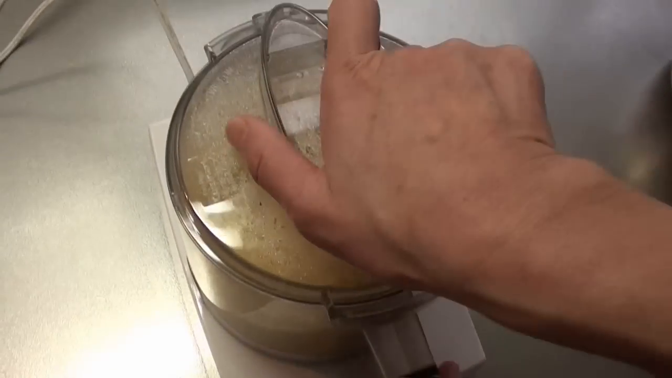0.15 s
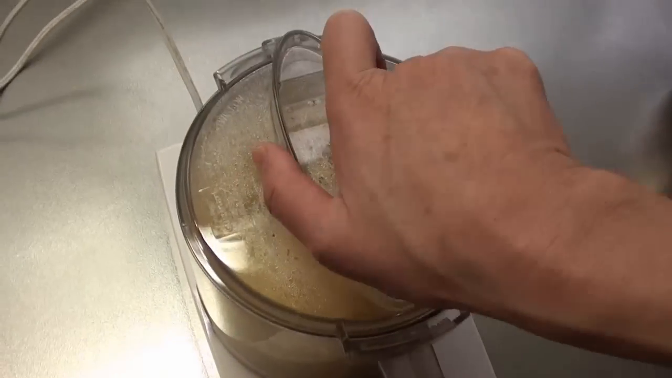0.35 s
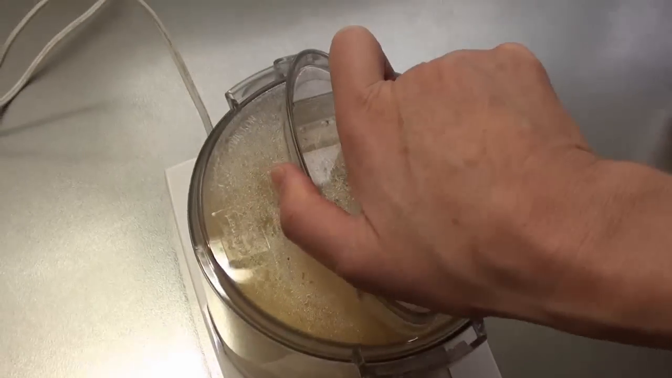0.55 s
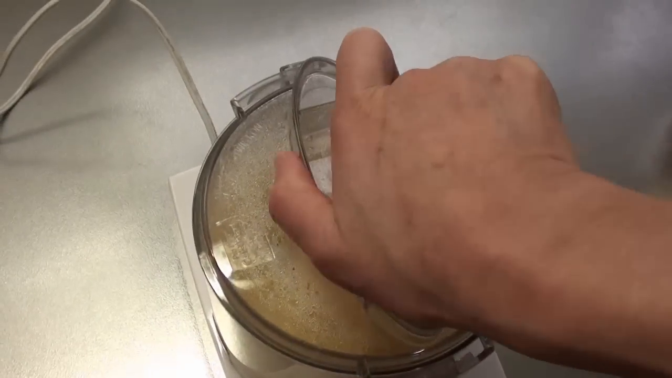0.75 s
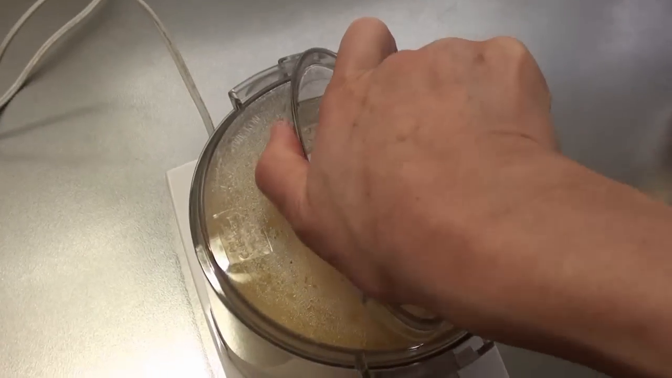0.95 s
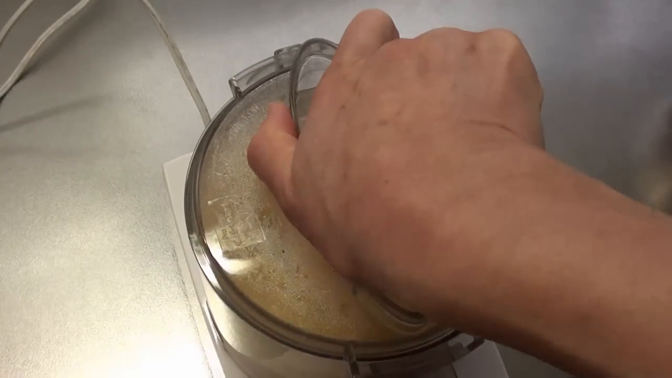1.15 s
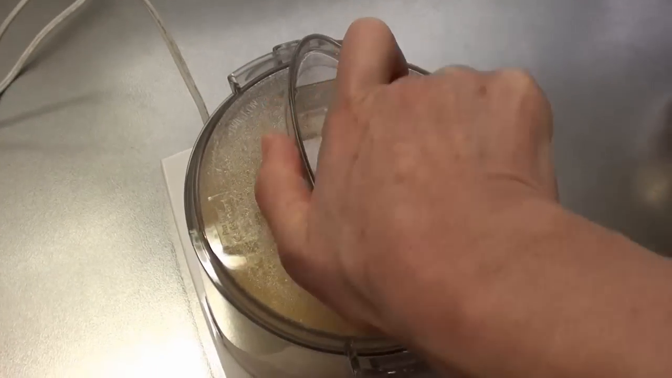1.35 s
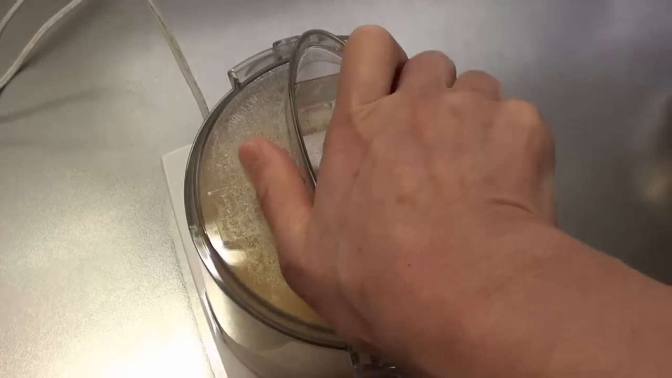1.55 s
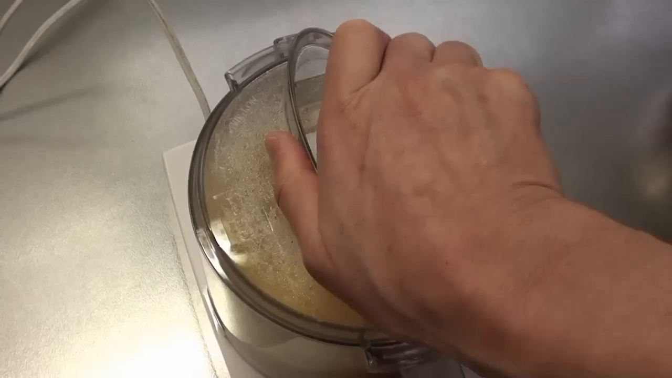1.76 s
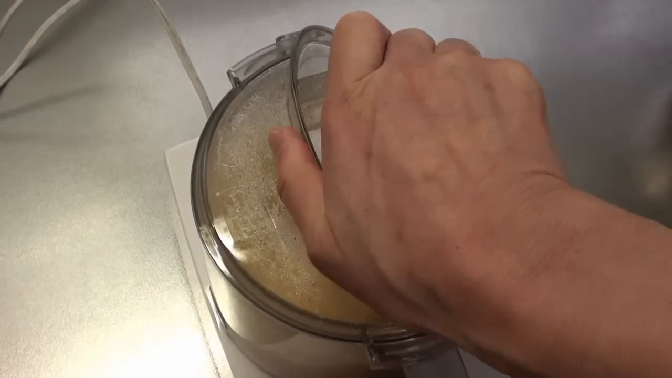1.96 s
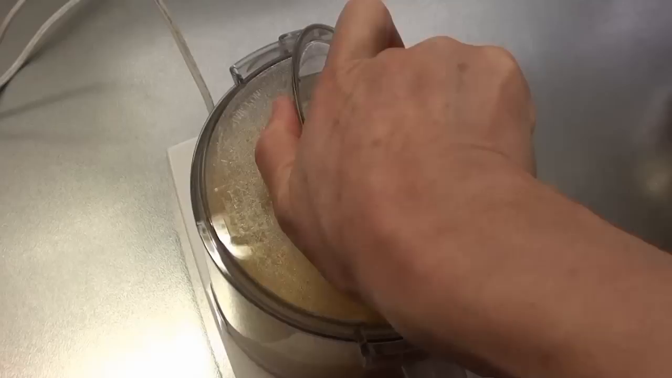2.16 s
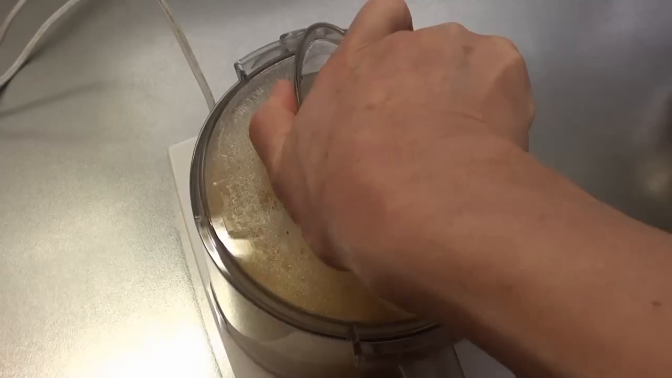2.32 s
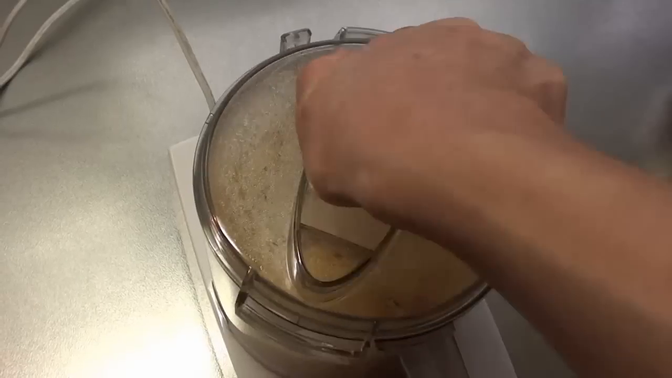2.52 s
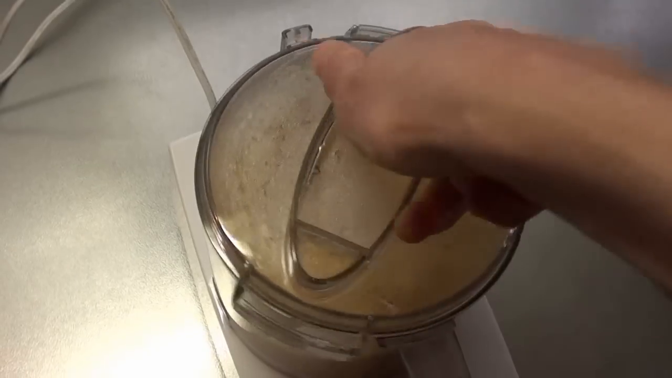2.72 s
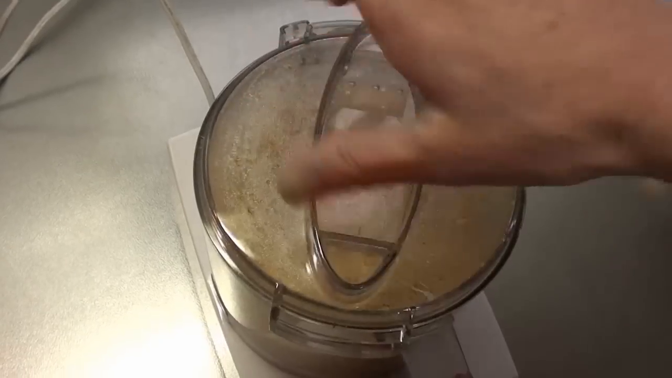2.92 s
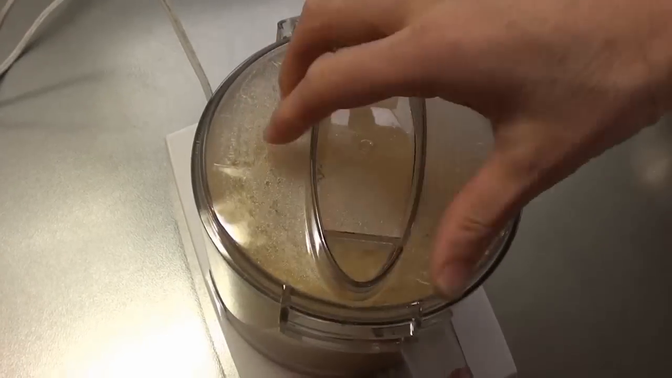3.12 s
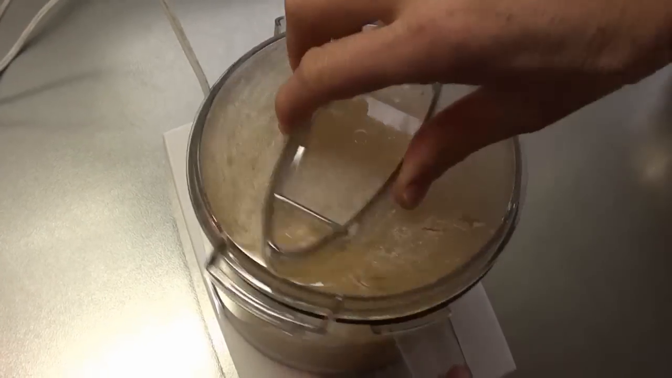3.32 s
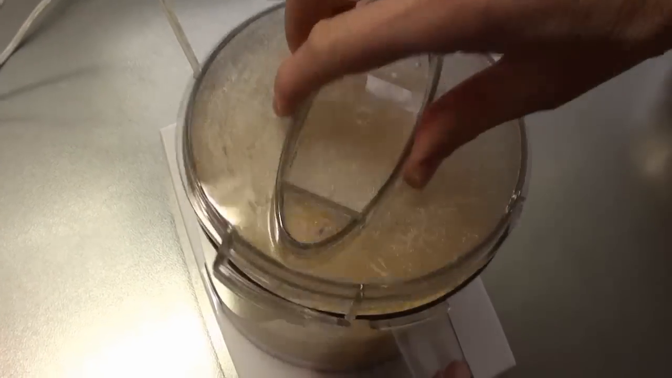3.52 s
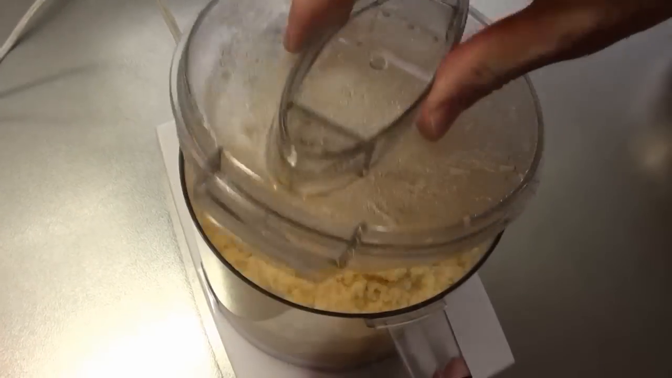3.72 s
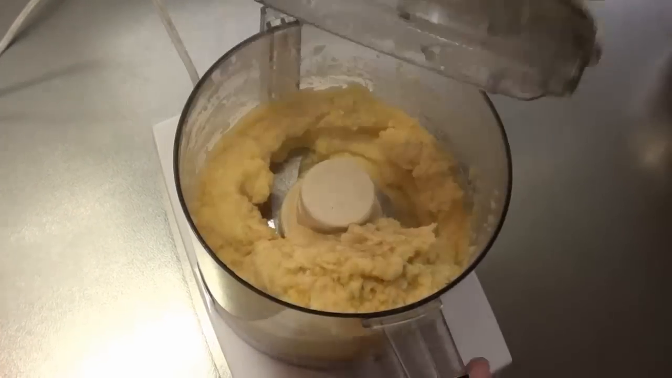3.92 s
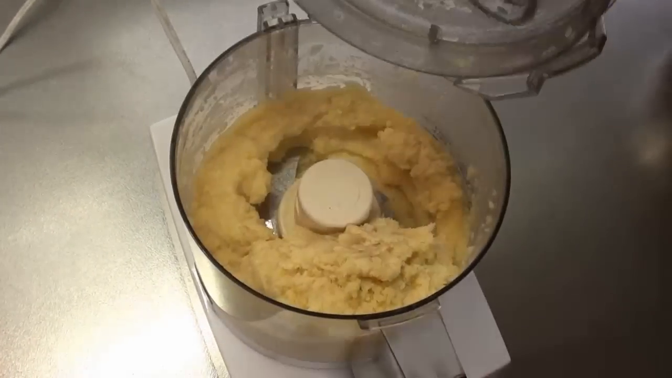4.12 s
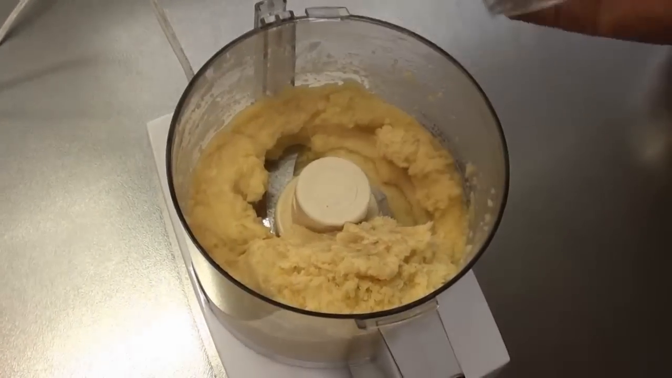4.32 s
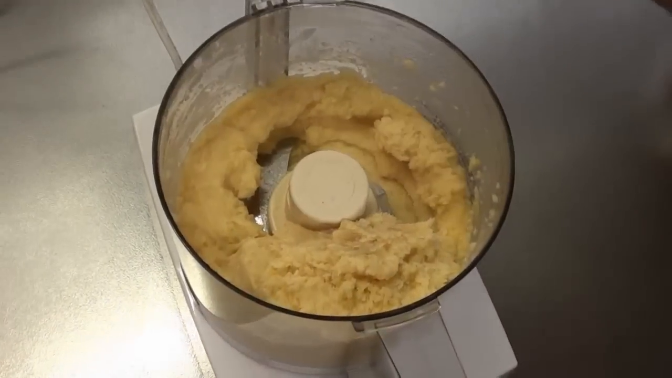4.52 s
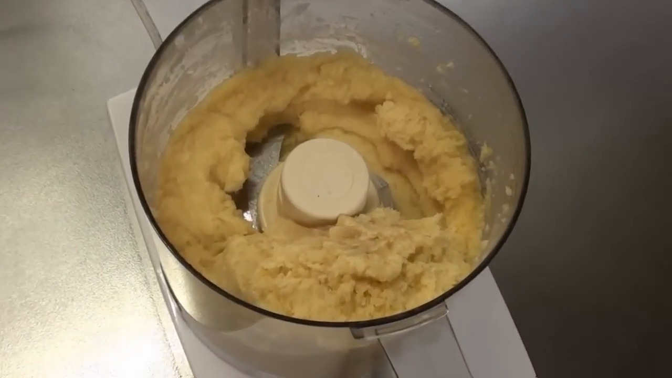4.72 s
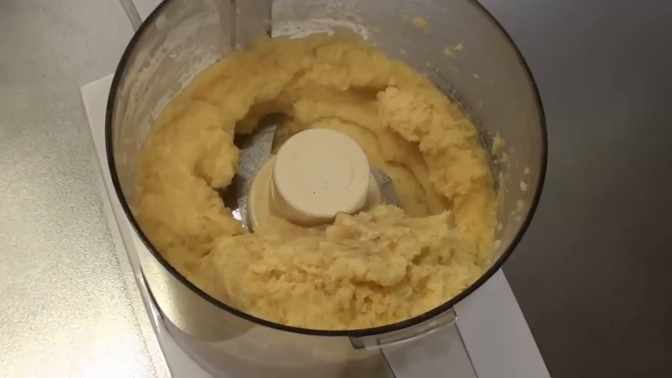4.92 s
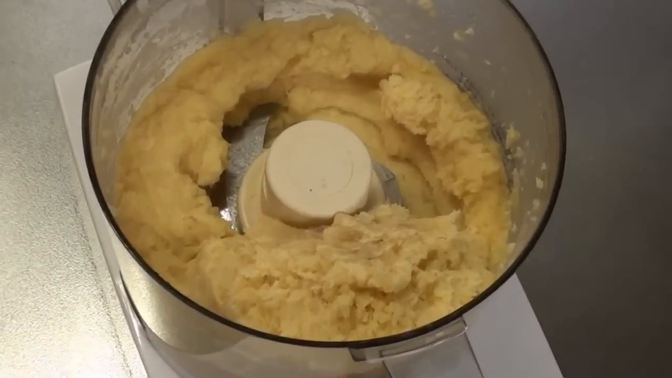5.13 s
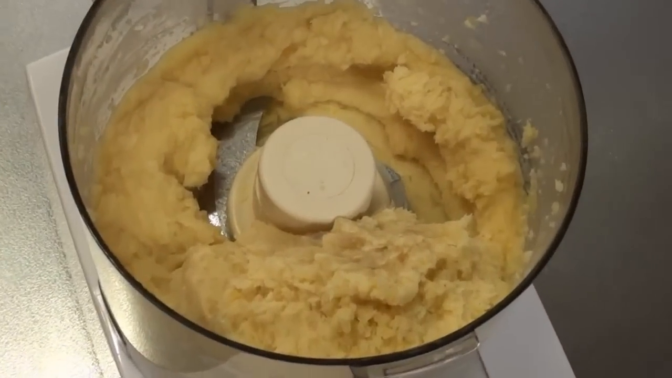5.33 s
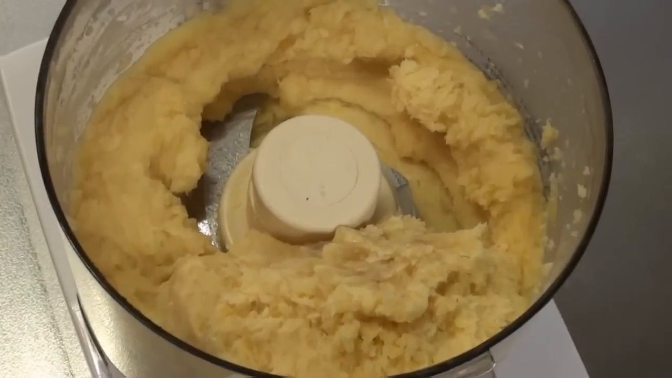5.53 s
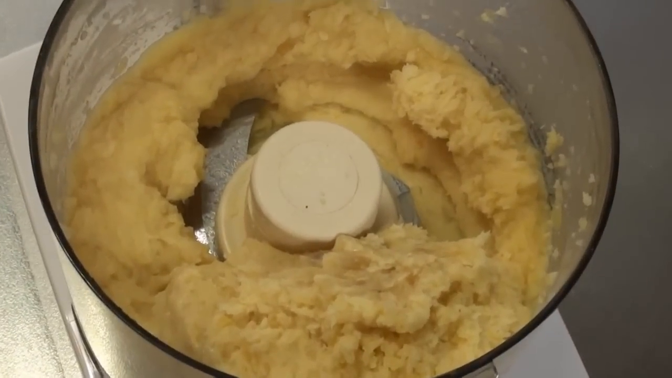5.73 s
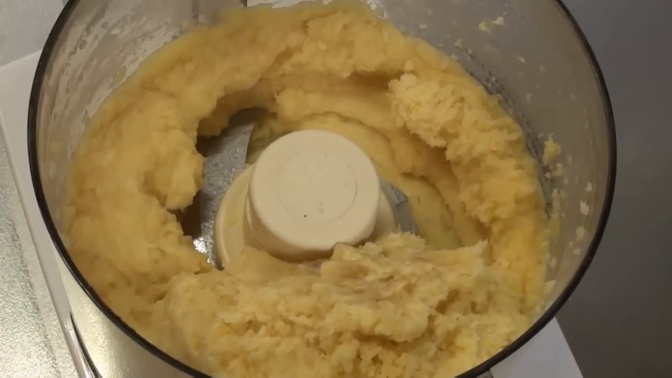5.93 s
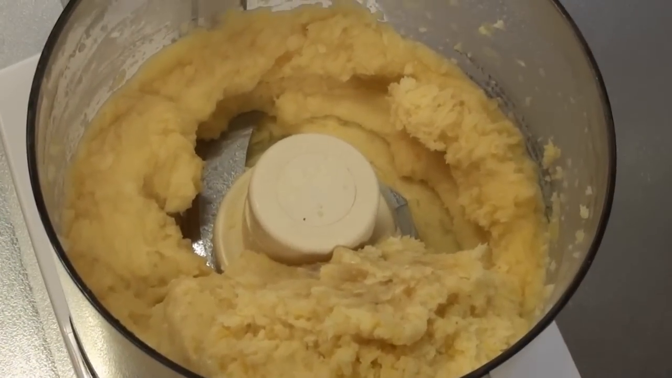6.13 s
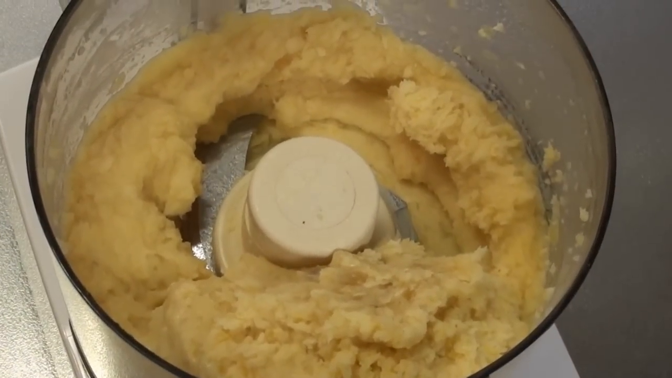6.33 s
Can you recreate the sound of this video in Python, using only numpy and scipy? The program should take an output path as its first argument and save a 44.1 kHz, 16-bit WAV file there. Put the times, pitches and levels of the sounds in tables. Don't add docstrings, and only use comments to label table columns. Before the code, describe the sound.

A food processor's plastic lid is twisted back and forth with sharp clacks, scrapes and tiny squeaks, then lifted off in a small hard kitchen.

```python
import sys
import numpy as np
from scipy import signal
from scipy.fft import rfft, irfft, next_fast_len
from scipy.io import wavfile

SR = 44100
rng = np.random.default_rng(int(sys.argv[2]) if len(sys.argv) > 2 else 0)


def volts_from_db(level):
    exponent = np.asarray(level, float) / 20
    return 10 ** exponent


def master(y):
    cut = np.clip(np.atleast_2d(y).T, -1, 1)
    pcm = np.round(cut * 32767)
    wavfile.write(sys.argv[1], SR, pcm.astype(np.int16))


N = 280816

# time in seconds, level in dB.
DRAG = [(0.0, -60.5), (0.48, -57.5), (0.64, -62), (0.81, -50), (1.265, -60.5), (1.28, -46), (1.68, -66.5),
        (1.84, -55), (2.38, -56.5), (2.65, -42), (2.73, -54), (2.87, -35), (2.94, -56.5), (3.33, -49.5),
        (3.39, -39), (3.48, -52), (3.61, -50), (3.68, -75.5)]


def in_time(rows):
    s, *columns = np.transpose(rows)
    return [np.interp(np.arange(N) / SR, s, column) for column in columns]


def at_hz(points, hz):
    table_hz, values = np.array(points).T
    return np.interp(np.log(hz), np.log(table_hz), values)


def by_zone(hz, zones_hz, zones_db):
    place = np.interp(np.log(hz), np.log(zones_hz), np.arange(len(zones_hz)))
    low = min(int(place), len(zones_hz) - 2)
    return zones_db[low] + (place - low) * (zones_db[low + 1] - zones_db[low])


def rms_one(x):
    return x / np.sqrt(np.mean(x ** 2) + 1e-20)


def drift(rate, size=N):
    r = np.exp(-2 * np.pi * rate / SR)
    wander = signal.lfilter([1], [1, -2 * r, r * r], rng.standard_normal(size + 20000))
    return rms_one(wander[20000:])


def ring(force, hz, t60):
    r, w = volts_from_db(-60 / (t60 * SR)), 2 * np.pi * hz / SR
    return signal.lfilter([0, np.sin(w)], [1, -2 * r * np.cos(w), r * r], force + 1e-18)


def bands(low_hz, per_octave):
    edges = low_hz * 2 ** (np.arange(40) / per_octave)
    edges = edges[edges < .42 * SR]
    return [(np.sqrt(a * b), signal.butter(2, [a, b], "band", fs=SR, output="sos"))
            for a, b in zip(edges, edges[1:])]


def left_right(mid, side, alike):
    return np.sqrt(1 + alike) * mid + np.sqrt(1 - alike) * side * [[1], [-1]]


def background():
    # frequency in Hz, level in dB per Hz.
    hiss_color = [(15, -47), (25, -16), (108, -9), (161, -9), (233, -6), (339, -6.5), (837, -8),
                  (931, -8.5), (2070, -11.5), (2490, -48), (2700, -14), (8460, -15.5), (14400, -21)]
    # time in seconds, level in dB.
    hiss_level = [(0, -53.5), (4, -54), (4.9, -54.5), (5.6, -56.5), (6.37, -58.5)]
    # frequency in Hz, likeness of the hiss at left and right (0 to 1).
    likeness = [(60, 0.65), (180, 0.74), (550, 0.112), (1650, 0.15), (4970, 0.76), (15000, 0.75)]
    # frequency in Hz, hiss at the left minus the right in dB.
    hiss_lean = [(60, -2.5), (240, -0.5), (950, 0), (3770, 0), (15000, 0)]
    # frequency in Hz, width in Hz, level in dB.
    hums = [(112.2, 17, -70), (239, 48, -72.5)]

    white, hiss = rng.standard_normal((2, 2, N)), 0
    for k, (hz, band) in enumerate(bands(25.17, 2.0)):
        mid, side = signal.sosfilt(band, white[k % 2])
        alike = np.clip(at_hz(likeness, hz), 0, 1)
        lean = volts_from_db(at_hz(hiss_lean, hz) / 2)
        hiss = hiss + volts_from_db(at_hz(hiss_color, hz)) * left_right(mid, side, alike) * [[lean], [1 / lean]]
    hum = sum(volts_from_db(db) * rms_one(ring(rng.standard_normal(N), hz, 3.1 / width)) for hz, width, db in hums)
    whine_hz, whine_db = 2518.5, -71
    whine = np.sqrt(2) * np.sin(2 * np.pi * whine_hz * np.arange(N) / SR)
    return volts_from_db(in_time(hiss_level)[0]) * rms_one(hiss) + hum + volts_from_db(whine_db + 0.5 * drift(6)) * whine


def counter():
    rumble_db, lumps_db = -48, 2.5
    level_db = 1.3 * (in_time(DRAG)[0] + 40) + rumble_db + lumps_db * drift(35)
    shake = volts_from_db(level_db) * rng.standard_normal(N)
    return 12 * signal.sosfilt(signal.butter(2, [55, 135], "band", fs=SR, output="sos"), shake)


def grains(per_s, spread_db):
    sizes = volts_from_db(spread_db * np.minimum(rng.exponential(1, N), 4)) * rng.choice([-1, 1], N)
    return rms_one(sizes * (rng.random(N) < per_s / SR))


def contacts():
    # time in seconds, crack level in dB, crack centre in Hz,
    # thump level in dB, thump centre in Hz.
    gripping = [
        (0.1051, -28.5, 3770, -34, 590),
        (0.2884, -28.5, 5370, -48, 248),
        (0.3406, -30, 5000, -42.2, 455),
        (0.403, -34, 1690, -35, 463),
        (0.5093, -52, 10000, -43, 270),
        (0.5711, -55, 9480, -49.5, 370),
        (0.6343, -39.5, 5000, -42, 384),
        (0.7062, -42, 1470, -53, 400),
        (0.751, -58, 10000, -45.5, 270),
    ]
    straining = [(0.803, -15, 9100, -38, 500), (0.8059, -1.5, 7500, -32.5, 503),
                 (0.829, -3.5, 7100, -18.5, 500), (0.9144, -28.5, 3630, -36.5, 230),
                 (0.9909, -19, 3560, -31.5, 587), (1.0857, -5, 2870, -20.5, 1080),
                 (1.279, -36.5, 1720, -30.5, 272), (1.371, -17.5, 3070, -28, 610),
                 (1.4275, -22, 4360, -34.1, 610), (1.477, -34.4, 4170, -46.1, 280),
                 (1.662, -39, 5000, -49, 324), (1.679, -27, 4150, -37, 334), (1.701, -15, 5000, -27.5, 483),
                 (1.722, -5.5, 5150, -29, 970), (1.752, -6.5, 3740, -22.5, 403),
                 (1.7857, -20.5, 1476, -20, 409), (1.9319, -13.5, 3360, -27, 660),
                 (2.095, -19, 3480, -33.5, 815), (2.153, -11, 5400, -22, 405),
                 (2.214, -28.5, 2640, -37.5, 600), (2.2361, -12.5, 3550, -34, 900),
                 (2.2671, -8.5, 2880, -27, 690), (2.3509, -5.5, 3190, -20.5, 555)]
    lifting = [(2.5348, -20, 3100, -26, 696), (2.564, -1, 8800, -21, 386), (2.583, -3.5, 4850, -27, 216),
               (2.606, -11, 5400, -26.5, 676), (2.702, -25.5, 2250, -26.5, 300),
               (2.7872, -15, 5270, -31, 780), (2.8049, -28, 1690, -27.5, 600),
               (2.8286, -9.5, 1800, -13, 850), (2.8436, -28, 1820, -19.5, 443),
               (2.91, -33.5, 2430, -36, 313), (2.9768, -25.5, 10100, -47, 238),
               (3.007, -18, 9900, -33, 387), (3.092, -33, 3090, -52, 400), (3.1495, -27, 1240, -10.5, 383),
               (3.2613, -22, 10000, -40, 240), (3.2795, -28, 2780, -22, 590),
               (3.2917, -13.5, 1820, -17, 596), (3.373, -24.5, 1780, -21.5, 630),
               (3.431, -25.5, 4200, -28, 490), (3.457, -30, 1700, -33.8, 824),
               (3.4885, -21, 1860, -27.5, 526), (3.578, -39.5, 1860, -49, 320),
               (3.6, -40, 5750, -39.5, 520), (3.6146, -40, 5200, -50, 550)]
    setting_aside = [
        (3.8578, -35, 2320, -33, 700),
        (3.939, -22.5, 10000, -39, 410),
        (3.947, -47, 10000, -39, 367),
        (3.966, -22, 9900, -36.5, 334),
        (4.3414, -48, 4000, -58, 770),
        (5.241, -60, 3260, -63, 360),
        (5.778, -43, 5160, -50, 480),
    ]
    rebounds = [
        (0.838, -32, 3000, -20.5, 620),
        (1.964, -45, 3500, -42.5, 500),
        (2.195, -66, 4000, -55, 300),
        (2.547, -1, 3500, -26, 500),
        (3.153, -16.5, 1390, -20, 400),
        (3.299, -32, 5000, -23.5, 350),
    ]
    return np.transpose(sorted(gripping + straining + lifting + setting_aside + rebounds))


def blows(times, lengths_ms, first):
    force, owner = np.zeros(N), np.zeros(N, int)
    size = (len(times), 1200)
    chatter = rng.standard_normal(size) * (rng.random(size) < .45)
    for k, (s, length_ms) in enumerate(zip(times, lengths_ms)):
        burst = chatter[k] * np.exp(-np.arange(1200) / (np.clip(length_ms, .2, 9) * SR / 1000))
        burst[0] = first
        i = round(s * SR)
        force[i:i + 1200] = burst / np.sqrt(np.sum(burst ** 2))
        owner[i:] = k
    return force, owner


def skirts(hz, centres_hz, skirt_db):
    below_db, above_db, lift_db = skirt_db
    octaves = np.log2(hz / centres_hz)
    loss = np.where(octaves < 0, below_db * octaves, -above_db * octaves)
    return loss + lift_db * np.exp(-(octaves / .25) ** 2)


def scrape_levels():
    # time of breaking free in seconds, slide in seconds, level in dB, fade over the slide in dB,
    # tilt in dB per octave.
    strokes = [(0.807, 0.016, -26, 8, 7), (1.089, 0.038, -25.5, 8, 8.5), (1.758, 0.049, -17.5, 13.5, 0),
               (2.153, 0.017, -37, -8, 4), (2.534, 0.14, -14.5, 18.5, -1.5), (2.833, 0.041, -12, 32, -2),
               (3.01, 0.034, -81, -2, -9), (3.151, 0.014, -38, 14, -21), (3.298, 0.0084, -24.5, 11, -6),
               (3.374, 0.035, -23.5, 12.5, 0), (3.424, 0.031, -34, 31, 15.5),
               (3.616, 0.014, -33.5, 6.5, 1.5), (3.94, 0.022, -36, 3, 11), (2.793, 0.038, -32.5, -4, 2.5),
               (3.263, 0.025, -55, -18, 5), (1.724, 0.03, -28.5, -6, 9)]
    creep_s, break_s = 0.027, .003
    creep_under_db, creep_swell_db, creep_tilt_db = 17, 2, 9
    slide_tilt_db = 0.16

    level_db, slope_db = np.full(N, -120.), np.zeros(N)
    for s, slide, db, fade_db, tilt_db in strokes:
        times = [s - creep_s, s - break_s, s, s + slide]
        i = np.arange(round(times[0] * SR), round(times[-1] * SR))
        creep_db = db + tilt_db - creep_under_db
        level = np.interp(i / SR, times, [creep_db - creep_swell_db, creep_db, db, db - fade_db])
        end_tilt_db = tilt_db + slide_tilt_db * fade_db
        slope = np.interp(i / SR, times, [creep_tilt_db, creep_tilt_db, tilt_db, end_tilt_db])
        louder = level > level_db[i]
        level_db[i[louder]], slope_db[i[louder]] = level[louder], slope[louder]
    return level_db, slope_db


def shell():
    # edge frequencies in Hz, then the level at each in dB.
    zones_hz = [1150, 1450, 2650, 4600, 8000, 12000]
    zones_db = [-10.5, -8.5, -6.5, -9, -13.5, -36]
    crack_skirt = (6, 6, 4)
    cycles = 15
    scrape_low_hz = 1440

    s, crack_db, centre_hz, _, _ = contacts()
    force, owner = blows(s, 7.4 + 0.24 * crack_db, first=1.3)
    pitches = np.geomspace(1230, 12000, 44) * volts_from_db(.1 * rng.standard_normal(44))
    spot_db = 1.5 * rng.standard_normal((len(s), 44))
    lean_db = 1.5 * rng.standard_normal(44)
    level_db, slope_db = scrape_levels()
    grit = volts_from_db(2.5 * drift(60)) * grains(4000, spread_db=4.0)
    out = np.zeros((2, N))
    for m, hz in enumerate(pitches):
        blow = volts_from_db(crack_db + skirts(hz, centre_hz, crack_skirt) + spot_db[:, m])
        scrape = volts_from_db(level_db - 19.5 + slope_db * np.log2(hz / 4000)) * grit
        push = force * blow[owner] + scrape / (1 + (scrape_low_hz / hz) ** 4)
        speed = np.diff(push, prepend=0) / (2 * np.sin(np.pi * hz / SR))
        own_range = signal.butter(1, [hz / 1.35, hz * 1.35], "band", fs=SR, output="sos")
        tone = ring(signal.sosfilt(own_range, speed), hz, cycles / hz)
        out += tone * volts_from_db(by_zone(hz, zones_hz, zones_db) + np.array([[lean_db[m]], [-lean_db[m]]]))
    return signal.sosfilt(signal.butter(2, 800, "high", fs=SR, output="sos"), out)


def bowl():
    # frequency in Hz, level in dB, time to fall 60 dB in seconds.
    modes = [(180, -24, 0.0083), (227.9, 0.5, 0.075), (265, 0.5, 0.11), (265.7, -0.5, 0.12),
             (368, 0.5, 0.089), (416, -7.5, 0.12), (459.2, 1.5, 0.058), (533.3, 0, 0.069), (635, 0.5, 0.04),
             (697.4, -5, 0.078), (777.4, 0.5, 0.033), (845.6, 2.5, 0.041), (944, -2.5, 0.025),
             (1097, -6.5, 0.044)]
    # frequencies in Hz, then the level at each in dB.
    zones_hz = [225, 350, 570, 810]
    zones_db = [4.5, -7, -5, -3]
    thump_skirt = (8, 5, 5)

    s, _, _, thump_db, centre_hz = contacts()
    force, owner = blows(s, np.full(len(s), 1.5), first=9)
    spot_db = 1.8 * rng.standard_normal((len(s), len(modes)))
    drag = volts_from_db(in_time(DRAG)[0] - 28.0 + 2.6 * drift(25)) * grains(900, spread_db=-3.0)
    lean_db = .7 * rng.standard_normal(len(modes))
    out = np.zeros((2, N))
    for m, (hz, mode_db, t60) in enumerate(modes):
        zone_db = by_zone(hz, zones_hz, zones_db)
        blow = volts_from_db(thump_db + skirts(hz, centre_hz, thump_skirt) + zone_db + spot_db[:, m])
        tone = ring(force * blow[owner] + drag * (300 / hz) ** 0.23, hz, t60)
        out += volts_from_db(mode_db) * tone * (-1) ** m * volts_from_db([[lean_db[m]], [-lean_db[m]]])
    return out


def squeaks():
    # start in seconds, hold in seconds, level in dB.
    grabs = [
        (1.084, 0.0085, -27.5),
        (1.753, 0.011, -30),
        (2.272, 0.0074, -30),
        (2.534, 0.029, -32.5),
    ]
    # slips per second, 2nd and 3rd harmonic in dB against the squeak's level.
    voices = [
        (1448, 0, -12),
        (1392, -3, 3),
        (1352, 6, -3),
        (1358, 3, -9),
    ]
    swell_db, release_s, flutter_db = 7, .008, 3
    upper_db = [-8 - 4 * k for k in range(4)]

    out = np.zeros(N)
    for (s, hold, db), (rate, second, third) in zip(grabs, voices):
        t = np.arange(round((hold + 5 * release_s) * SR)) / SR
        grip = np.clip(t / 0.00033, 0, 1) * np.exp(-np.maximum(t - hold, 0) / release_s)
        slips_per_s = rate * (1 + .009 * drift(250, size=9000)[:len(t)])
        phase = 2 * np.pi * np.cumsum(slips_per_s) / SR
        first = swell_db * (np.minimum(t / hold, 1) - .5)
        tone = 0
        for k, own_db in enumerate([first, second, third] + upper_db):
            flutter = flutter_db * drift(100, size=9000)[:len(t)]
            tone = tone + volts_from_db(db + own_db + 11.0 + flutter) * np.sin((k + 1) * phase + k)
        out[round(s * SR):][:len(t)] += grip * tone
    return out


def far_ticks():
    # time in seconds, pitch in Hz, level in dB, time to fall 60 dB in seconds.
    ticks = [
        (5.242, 3200, -46, 0.018),
        (5.779, 4130, -48, 0.013),
    ]
    s, pitches_hz, levels_db, t60s = np.transpose(ticks)
    force, owner = blows(s, np.full(len(s), 2.0), first=2.4)
    out = np.zeros(N)
    for k, (hz, db, t60) in enumerate(zip(pitches_hz, levels_db, t60s)):
        for detune in (.96, 1.05):
            out += volts_from_db(db) * ring(force * (owner == k), hz * detune, t60)
    return out


def kitchen(x):
    # frequency in Hz, time to fall 60 dB in seconds.
    decay = [(200, .2), (700, .25), (2000, .3), (5000, .27), (10000, .18)]
    # frequency in Hz, likeness of the reflections at left and right (0 to 1).
    likeness = [(200, 0.94), (700, 1), (2000, 0.79), (8000, 1)]
    level_db, gap_ms = -8.5, 0.93

    t = np.arange(int(.5 * SR)) / SR
    white, echo = rng.standard_normal((2, 2, len(t))), 0
    for k, (hz, band) in enumerate(bands(82.1, 0.93)):
        mid, side = signal.sosfilt(band, white[k % 2])
        alike = np.clip(at_hz(likeness, hz), 0, 1)
        echo = echo + left_right(mid, side, alike) * volts_from_db(-60 * t / at_hz(decay, hz))
    echo = echo * np.clip(t * 1000 / gap_ms - 1, 0, 1)
    echo = echo / np.sqrt(np.sum(echo ** 2) / 2)
    return volts_from_db(level_db) * signal.fftconvolve(x[None], echo, axes=1)[:, :N]


def ports(x):
    # frequency in Hz, radians by which the left port leads.
    lead = [(100, 0), (400, .3), (950, 0.57), (3500, 0.14), (5100, 1), (8600, -0.73), (12000, -1.1)]
    size = next_fast_len(N + 4096)
    hz = np.maximum(np.arange(size // 2 + 1) * SR / size, 1)
    half_lead = at_hz(lead, hz) / 2
    return irfft(rfft(x, size) * np.exp(1j * half_lead * [[1], [-1]]), size)[:, :N]


def scene():
    near = (shell() + bowl() + squeaks() + far_ticks()) * volts_from_db(np.array([[-.3], [.3]]))
    mic_range = signal.butter(4, [132, 10700], "band", fs=SR, output="sos")
    near = signal.sosfilt(mic_range, near)
    return ports(near + kitchen(near.mean(axis=0))) + counter() + background()


def band_limit(x):
    return signal.sosfilt(signal.butter(12, 15760, fs=SR, output="sos"), x)


def record(dry):
    mix = .7 * np.tanh(dry / .7)
    mix = signal.sosfilt(signal.ellip(10, .3, 70, 14750, fs=SR, output="sos"), mix)
    mix = signal.sosfilt(signal.butter(2, 52, "high", fs=SR, output="sos"), mix)
    return band_limit(mix)


dry = scene()
out = record(dry)
master(out)
```